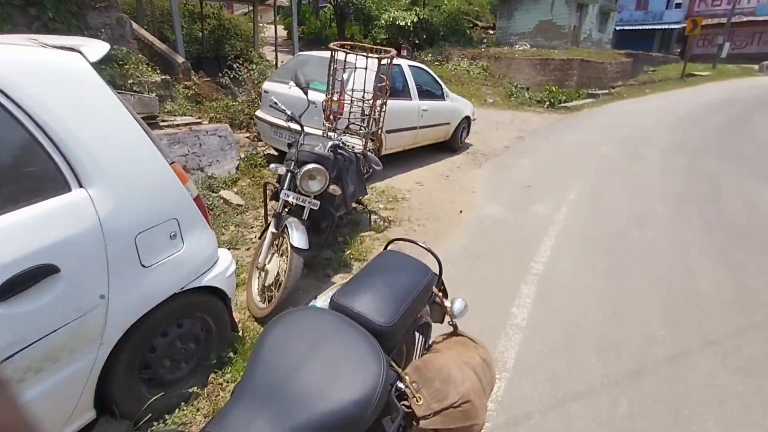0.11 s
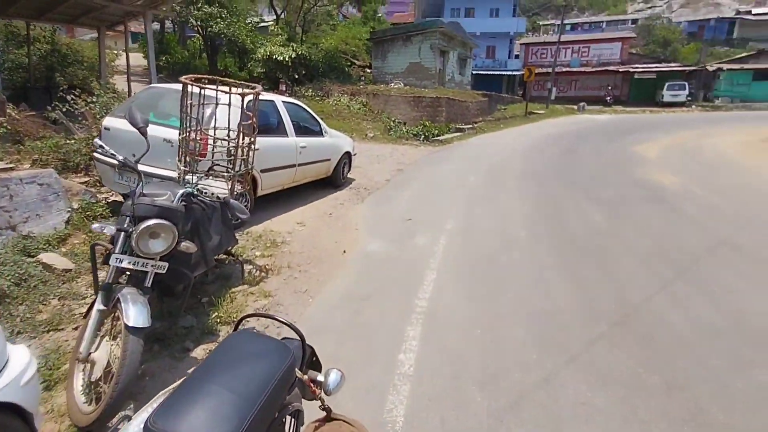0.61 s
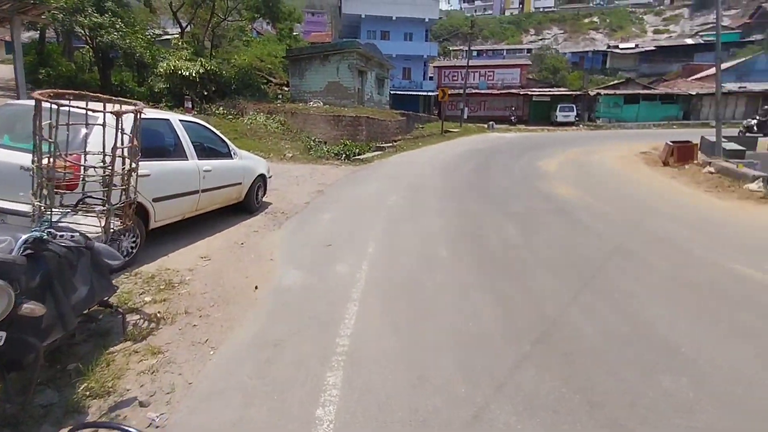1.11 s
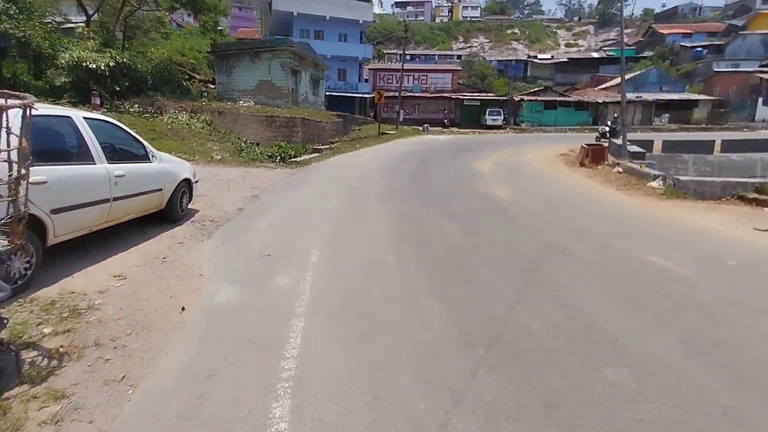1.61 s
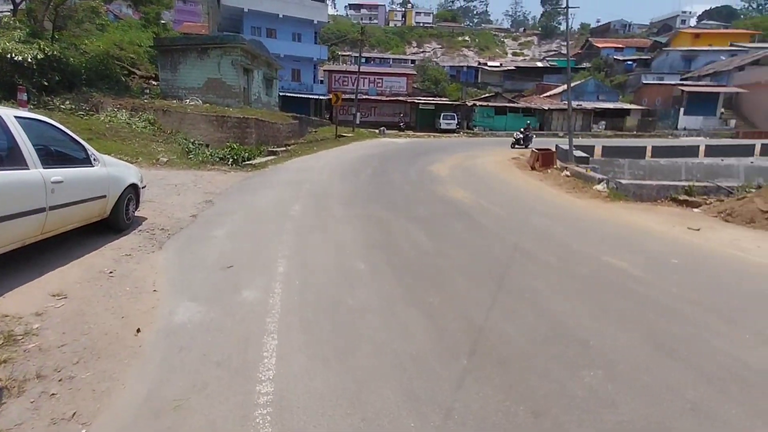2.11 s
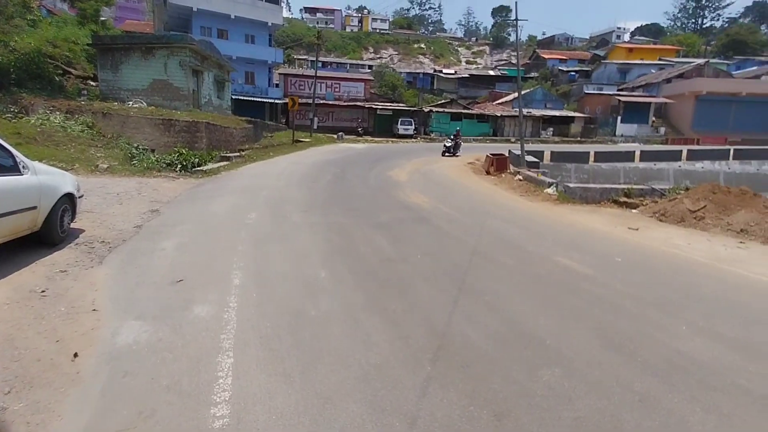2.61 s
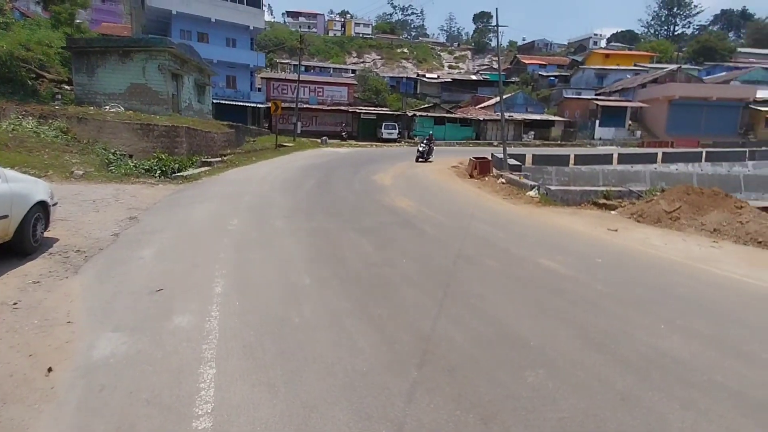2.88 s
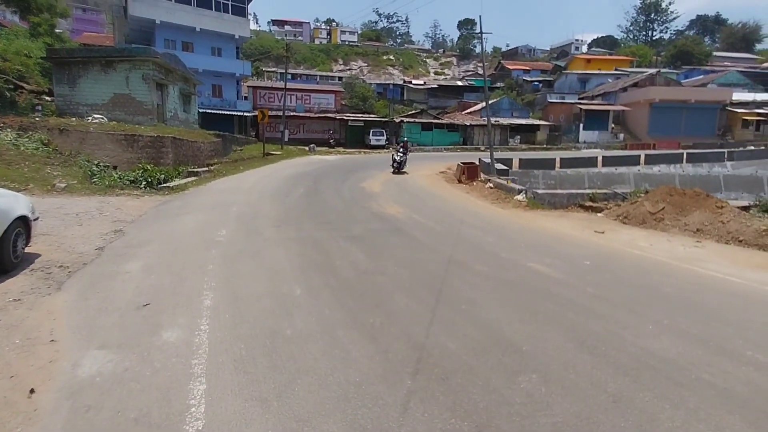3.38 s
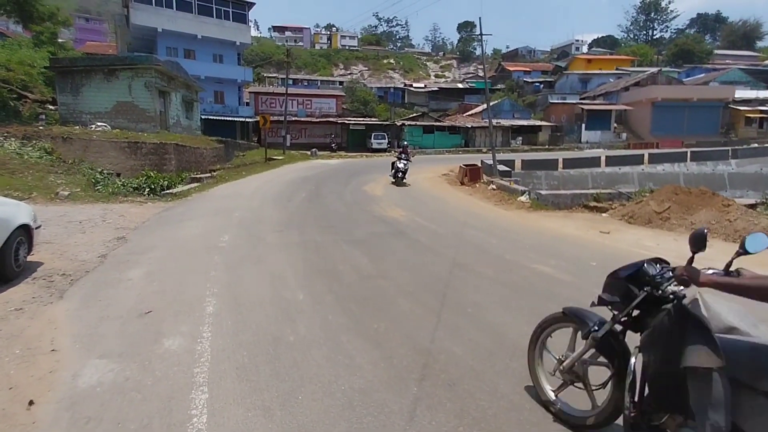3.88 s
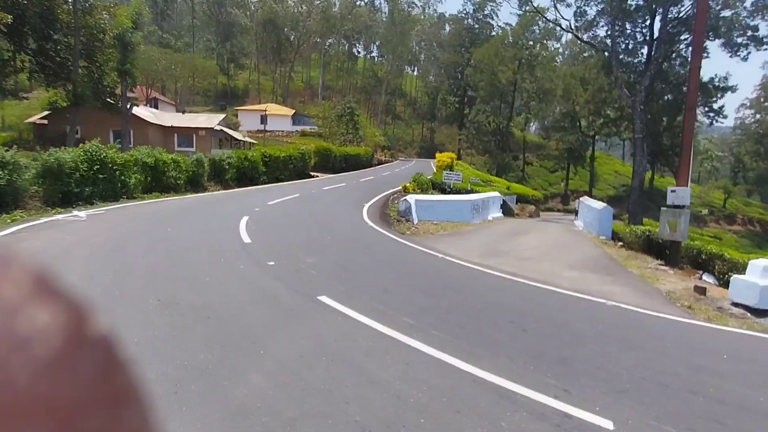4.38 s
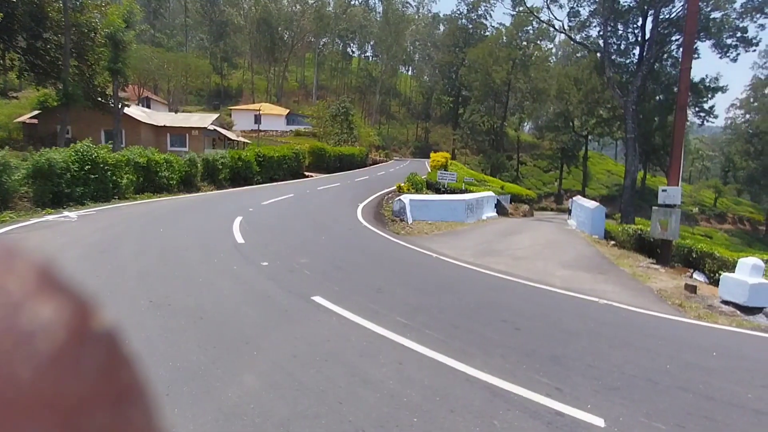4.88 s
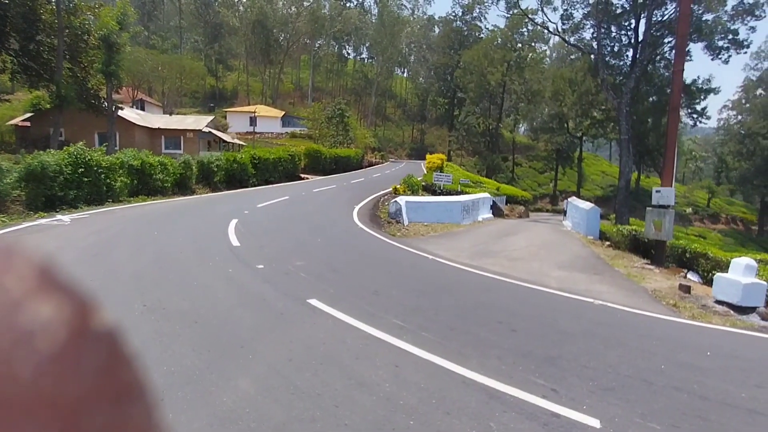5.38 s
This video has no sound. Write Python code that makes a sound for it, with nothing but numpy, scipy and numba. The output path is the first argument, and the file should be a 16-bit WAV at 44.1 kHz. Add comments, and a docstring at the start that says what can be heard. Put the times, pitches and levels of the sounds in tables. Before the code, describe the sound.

A distant motorcycle drones by a roadside, another single-cylinder bike thuds past very close, then an abrupt cut to wind buffeting and faint bird chirps.

```python
"""Roadside heard through a two-port microphone, then a quiet country road after a cut and a short silence.
A distant single-cylinder motorcycle drones (summed engine orders) over road noise (coloured noise bands);
a narrow pipe note joins, a second machine comes up close from behind (pulses ringing resonators), gravel
crunches (random clicks), and whistles, gear whine, a squeak and a bending rattle follow. After the silence,
wind buffets each port (noise, grains, pressure pulses), leaves rustle (noise) and a bird chirps (sines)."""
import sys
import numpy as np
from scipy import signal
from scipy.fft import rfft, irfft
from scipy.io import wavfile
from scipy.ndimage import uniform_filter1d
from numba import njit

SR = 44100
rng = np.random.default_rng(int(sys.argv[2]) if len(sys.argv) > 2 else 0)


def bounce(signal):
    """Save signal as a 16-bit WAV file at the path given by the first command-line argument."""
    frames = np.transpose(np.atleast_2d(signal))
    limited = np.clip(frames, -1, 1)
    pcm = np.round(limited * 32767).astype(np.int16)
    wavfile.write(sys.argv[1], SR, pcm)


def field_ratio(decibels):
    """Amplitude ratio for a level in dB (20 dB per decade); scalars and array-likes work."""
    return 10 ** (np.asarray(decibels, dtype=float) / 20)


N = 242550
T = np.arange(N) / SR
CUT_S, RESUME_S = 4.26885, 4.3205  # silence lies between
NEAR_START_S = 2.23  # the passing engine is heard from here
SIDES = np.array([[1], [-1]])  # left, right

# firing rate of the passing engine: t/s, f/Hz
PASSING_RATE = [(2.2, 31.31), (2.4, 32.11), (2.6, 33.33), (2.75, 32.7), (3.0, 31.36), (3.2, 30.89),
                (3.4, 29.93), (3.6, 29.46), (3.8, 28.43), (3.87, 30.73), (3.94, 29.92), (4.0, 32.21),
                (4.05, 31.15), (4.09, 26.11), (4.145, 26.22), (4.2, 28.04), (4.27, 30.19)]


def columns(table):
    """Linear interpolation: the curve columns of a table at every sample."""
    s, *cols = np.transpose(table)
    return [np.interp(T, s, c) for c in cols]


def unit(x):
    """Normalisation to rms 1."""
    return x / np.sqrt(np.mean(x ** 2))


def bump(s, width):
    """Gaussian envelope, top 1, falling to 1/e at width seconds from s."""
    return np.exp(-((T - s) / width) ** 2)


@njit
def svf(x, hz, width):
    """State-variable band-pass: a resonator with moving centre and width, gain 1 at the centre."""
    y, b, l = np.empty(len(x)), 0., 0.
    for i in range(len(x)):
        g, k = np.tan(np.pi * hz[i] / SR), width[i] / hz[i]
        v = (b + g * (x[i] - l)) / (1 + g * (g + k))
        b, l, y[i] = 2 * v - b, l + 2 * g * v, k * v
    return y


def ring(x, hz, width_hz):
    """Forced resonance: one resonator driven by x, rms 1."""
    return unit(svf(x, hz + 0 * T, width_hz + 0 * T))


def walk(rate):
    """Slow random modulation: levels held 1 / rate s and smoothed twice; spread near 1."""
    k = int(SR / rate)
    held = np.repeat(rng.standard_normal(N // k + 1), k)
    return 1.19 * uniform_filter1d(uniform_filter1d(held, k), k)[:N]


def band(x, colour, lo_hz, hi_hz):
    """Spectral shaping: x coloured by (f/Hz, level/dB) points within one soft-edged band, rms 1."""
    f = np.arange(1, N // 2 + 2) * SR / N
    hz, db = np.transpose(colour)
    edges = 1 / np.sqrt((1 + (lo_hz / f) ** 8) * (1 + (f / hi_hz) ** 8))
    gain = field_ratio(np.interp(np.log(f), np.log(hz), db))
    return unit(irfft(rfft(x) * gain * edges, N))


def ports(x, lag, pan_db):
    """Time and level differences: the left port hears x lag samples after the right, pan_db louder."""
    pair = np.array([np.interp(T - side * lag / 2 / SR, T, x) for side in (1, -1)])
    return pair * field_ratio(SIDES * pan_db / 2)


def pressure_pulse(s, width):
    """Pressure pulse with a dip on either side (negative second derivative of a Gaussian), top 1."""
    u = (T - s) / width
    return (1 - u ** 2) * np.exp(-u ** 2 / 2)


def wavering_tone(hz, db):
    """Frequency and amplitude modulation of a sine by slow random walks; mute below -69 dB."""
    phase = 2 * np.pi * np.cumsum(hz * (1 + .002 * walk(60))) / SR
    return field_ratio(db + 2.0 * walk(30)) * np.sqrt(2) * np.sin(phase) * (db > -69)


def far_bike():
    """Fourier synthesis: engine orders beat as firings; those near a favoured note are lifted."""
    # distant engine: t/s, firing rate f/Hz, level/dB, f/Hz of the note reflections favour, its lift/dB
    course = [(0, 33.48, -48, 196, 22), (.12, 32.97, -37, 198, 15), (.59, 33.66, -29.5, 213, 10),
              (.85, 34.17, -28.5, 201, 18), (.97, 34.18, -29.5, 205, 19.5), (1.11, 34.23, -27.5, 206, 16.5),
              (1.2, 34.52, -27.5, 202, 12.5), (1.31, 34.82, -29, 175, 15), (1.38, 34.64, -26.5, 198, 15),
              (1.46, 34.36, -27.5, 169, 13), (1.62, 34.44, -26, 205, 14.5), (1.76, 35.03, -31.5, 224, 20),
              (2.04, 34.56, -33, 220.5, 18), (2.1, 34.63, -35, 189, 10), (2.21, 33.84, -32, 201, 21),
              (2.29, 32.17, -32.5, 162, 24.5), (2.4, 31.35, -41, 159, 15), (2.45, 31.7, -33.5, 156, 29)]
    # harmonic spectrum: order, level/dB re the engine before lift and wavering
    orders = [(1, -34), (2, -8), (3, -15.5), (4, -34), (5, -15.5), (6, -16), (7, -14), (8, -16), (9, -18),
              (10, -17.5), (11, -22.5), (12, -26.5), (13, -26.5), (14, -29.5), (15, -28), (16, -29.5),
              (17, -30), (18, -30.5), (19, -34), (20, -37), (21, -47), (22, -41)]
    hz, level_db, favour_hz, lift_db = columns(course)
    phase = 2 * np.pi * (.6 + np.cumsum(hz) / SR)
    out = 0
    for order, db in orders:
        k = round(order)
        # low orders trail one another so each beat rings; the upper ones arrive together as a tick
        low = min(k, 10)
        db = db + lift_db * np.exp(-((k * hz - favour_hz) / 29) ** 2)
        # all waver; the upper orders come and go
        db = db + .8 * walk(10.48) + 2.0 * max(low - 7, 0) ** .5 * walk(7.0)
        if k == 3:  # this order booms for a while
            db = db + 12 * bump(0.64, 0.41)
        trail = .13 * low * (2 * k - low)
        scatter = 1.5 * (rng.random() + 0.05 * low * walk(7.94))
        out = out + field_ratio(level_db + db) * np.cos(k * phase - trail + scatter)
    fade = np.clip((2.55 - T) / 0.45, 0, 1)
    return ports(np.sqrt(2) * out * fade, 4.6, -1.6)


def road(cycle):
    """Broadband noise radiation: rumble, tyres, rattle and hiss; casing modes ring, a firing puffs."""
    # road and machinery: t/s, nearness level/dB
    nearness = [(0, 2.5), (.2, -2.5), (.28, 3.5), (.6, 2.5), (1.04, 4), (1.55, 7.5), (1.7, 6.5), (2.2, 6),
                (2.56, 5), (3.05, 10), (3.49, 15.5), (3.78, 21), (3.98, 23), (4.04, 27), (4.19, 17.5),
                (4.26, 20.5)]
    # noise spectrum: f/Hz, level/dB per Hz before each band is normalised
    colour = [(15, -62), (25, -30.5), (74, -10), (130, -14.5), (200, -9.5), (451, -29), (863, -32.5),
              (1100, -35.5), (1330, -37.5), (1650, -34.5), (2160, -35.5), (2690, -46), (6210, -49),
              (7310, -45.5), (8360, -57.5), (11000, -45), (16000, -47.5)]
    # casing resonances: f/Hz, width/Hz, mean level/dB before colouring
    casing = [(1730, 290, -19), (2300, 430, -20), (2670, 300, -2)]
    # bands: low f/Hz, high f/Hz, level/dB at nearness 0, slope/(dB/dB), late change/dB, likeness 0-1
    layers = [(20, 1120, -38.5, 0.25, -0.5, 0.62), (422, 356, -50.5, 0.3266, 4, 0.99),
              (500, 750, -57.5, 0.84, -11, 0.6), (830, 1250, -50.5, 0.4751, 4.5, 0.41),
              (1560, 3600, -54.5, 0.8165, -5, 0.31), (3060, 6090, -55, 0.6326, 3, 0.01),
              (8200, 12800, -66, 1.1075, -1.2, 0)]
    # port delay of the shared noise: t/s, samples by which the left trails
    delay = [(.6, -8), (1.3, 13), (3, 14.5)]
    near_db, = columns(nearness)
    lag, = columns(delay)
    # as the engine draws level the road sound changes: some bands sink, others rise
    late = np.clip((T - 3.98) / .06, 0, 1)
    puff = 1 + 0.5 * np.exp(-cycle / 0.76) * (T > NEAR_START_S)
    shared = walk(4.91)
    out = 0
    for lo_hz, hi_hz, far_db, slope, late_db, alike in layers:
        noise, left, right = rng.standard_normal((3, N))
        same = noise
        # the casing resonances drift and flicker, so they show as patches
        for hz, width_hz, db in casing:
            if lo_hz < hz < hi_hz:
                drifting_hz = hz * (1 + 0.036 * walk(3.47))
                same = same + field_ratio(db + 2.6 * walk(16)) * ring(noise, drifting_hz, width_hz)
        same, left, right = (band(v, colour, lo_hz, hi_hz) for v in (same, left, right))
        pair = np.sqrt(alike) * ports(same, lag, 0) + np.sqrt(1 - alike) * np.array([left, right])
        pair = pair * field_ratio(SIDES * 2.5 / 2 * (lo_hz > 3000))  # the hiss leans left
        level_db = far_db + slope * near_db + late_db * late + 0.71 * shared + 1.0 * walk(20)
        out = out + pair * field_ratio(level_db) * puff
    return out * field_ratio(SIDES * -0.8 / 2)


def drone(cycle):
    """Pipe resonance: firings and some gas noise drive one narrow mode."""
    # pipe note: t/s, f/Hz, mean level/dB
    note = [(1.85, 840, -63), (2.04, 860.3, -49), (2.15, 838, -53), (2.36, 825, -45), (2.5, 833, -44),
            (2.62, 838, -45), (2.75, 840, -50), (2.92, 827, -44), (3.0, 830, -55), (3.08, 830, -46),
            (3.16, 826, -57), (3.27, 860, -42), (3.36, 874, -50), (3.5, 900, -48), (3.62, 973, -44.5),
            (3.8, 940, -55)]
    hz, db = columns(note)
    firings = unit(1. * (np.diff(cycle, prepend=0) < 0))
    drive = firings + .7 * rng.standard_normal(N)
    tone = ring(ring(drive, hz, 38), hz, 99)
    on = (T > note[0][0]) & (T < note[-1][0])
    return ports(field_ratio(db + 1.4 * walk(25.5)) * tone * on, 9.4, 0)


def near_bike():
    """Impulse excitation: firings thud, ring silencer and pipe, echo off a wall; also gives the cycle."""
    # passing engine: t/s, level/dB, silencer ring/dB re that level before an 8.5 dB cut, ring f/Hz
    course = [(2.2, -39, 4.5, 180), (2.27, -29.5, -22, 174.1), (2.37, -33.5, 6.5, 161),
              (2.61, -34, 0.5, 163), (2.71, -31, -27, 166), (2.77, -29.5, 4, 160), (3.24, -27, 0, 182),
              (3.29, -26.5, -7, 185), (3.45, -26, 6.5, 177), (3.66, -24.5, 2.5, 168), (3.85, -24, 0.5, 131),
              (3.92, -27.5, 12, 184), (4.0, -25.5, 13.5, 192), (4.09, -26.5, 12.5, 189),
              (4.16, -24.5, 11.5, 192), (4.26, -22, 11.5, 197)]
    # blunt thud heard ahead of the machine: f/Hz, level/dB per Hz before normalising
    thud_colour = [(30, -35), (62, -50), (92, 0), (125, 2.5), (185, -1.5), (250, -29.5), (330, -47),
                   (450, -45)]
    # bark of the pipe: t/s, f/Hz, level/dB re the engine
    bark_course = [(2.6, 300, -16), (2.8, 290, -13), (3.2, 270, -12), (3.4, 220, -10), (3.8, 210, -10),
                   (3.92, 270, -16), (4.07, 277, -19), (4.26, 276, -21)]
    start = int(PASSING_RATE[0][0] * SR)
    turns = np.cumsum(columns(PASSING_RATE)[0]) / SR  # one turn per firing
    turns = turns - turns[start] + .61
    fired = start + np.flatnonzero(np.diff(np.floor(turns[start:])))
    pulses = np.zeros(N)
    pulses[fired] = -field_ratio(0.092 * rng.standard_normal(len(fired)))
    level_db, ring_db, ring_hz = columns(course)
    # close by, the direct sound wins: the echo weakens and each ring dies sooner
    clear = np.clip((T - 4.06) / .08, 0, 1)
    echo = np.roll(pulses, int(.0105 * SR))
    pulses = pulses + .27 * .3 ** clear * echo
    thud = band(np.roll(pulses, int(0.0025 * SR)), thud_colour, 10, 4800)
    # the gas leaves as a soft push of a few milliseconds
    push = np.sin(np.pi * np.clip(np.arange(400) / SR / .0035, 0, 1)) ** 2
    gas = signal.fftconvolve(pulses, push)[:N]
    ring_width_hz = 58 + (85 - 58) * clear
    silencer = ring(ring(gas, ring_hz, ring_width_hz), ring_hz, 300)
    bark_hz, bark_db = columns(bark_course)
    bark = ring(ring(gas, bark_hz, 70), bark_hz, 110)
    # the lowest pipe note comes up at close range
    boom = field_ratio(-8) * bump(3.88, 0.3) * ring(ring(gas, 61, 14), 61, 28)
    # the throttle opens again: the thud gives way to the ring
    opened = np.clip((T - 3.87) / 0.039, 0, 1)
    engine = field_ratio(-7 * opened) * thud + boom + field_ratio(ring_db - 8.5) * silencer + field_ratio(bark_db) * bark
    # the bearing swings round towards abreast at 4.4 s; samples
    lag = 18.5 * np.sin(np.arctan((4.4 - T) / 0.42))
    return ports(field_ratio(level_db) * engine * (T > NEAR_START_S), lag, -1), turns % 1


def gravel():
    """Impact noise: stones under a tyre crack in quick bursts of unequal clicks, the loudest ringing."""
    # bed of small cracks: t/s, level/dB before an 8 dB cut and flicker
    bed_course = [(2.22, -45), (2.27, -33.5), (2.31, -31), (2.35, -33), (2.374, -33), (2.4, -40),
                  (2.42, -32.5), (2.46, -36.5), (2.54, -49)]
    # crack spectrum: f/Hz, level/dB per Hz before normalising
    colour = [(400, 2.5), (800, 8), (1300, 4.5), (2400, 6), (3300, 2), (4800, -8), (6000, -17), (8400, -26),
              (11000, -21), (15000, -22)]
    # loudest cracks: t/s, relative level/dB
    loudest = [(2.233, -38), (2.256, -35), (2.2734, -34), (2.283, -33), (2.292, -31), (2.3061, -28),
               (2.3241, -22), (2.3421, -23), (2.349, -21), (2.362, -26), (2.3729, -24), (2.383, -30),
               (2.3924, -34), (2.408, -34), (2.4184, -25), (2.4423, -27), (2.455, -30)]
    spurts = sum(field_ratio(db) * bump(s + .0015, 0.0013) for s, db in loudest)
    on = np.clip((T - 2.24) / 0.022, 0, 1) * np.clip((2.54 - T) / 0.093, 0, 1)
    bed = field_ratio(columns(bed_course)[0] - 8.0 + 2.1 * walk(160)) * on
    struck = rng.random((3, N)) < 3000 / SR  # mean rate 3000 per second
    size = field_ratio(3.0 * rng.exponential(size=(3, N)))
    cracks = struck * size * rng.choice([-1, 1], (3, N))
    same, left, right = (band(v, colour, 300, 15000) for v in cracks)
    rings = 0
    for s, db in loudest:
        u = np.maximum(T - s, 0) / 0.0013
        hz = 2387 * (1 + 0.082 * rng.standard_normal())
        rings = rings + field_ratio(db + 2.0) * u * np.exp(-u) * np.sin(2 * np.pi * hz * (T - s))
    pair = ports(same, 18.6, 0) + 1.63 * np.array([left, right])
    return pair * (bed + 0.34 * spurts) + ports(rings, 19.0, 0)


def whistles():
    """Tone plus narrow-band noise: brief breathy whistles of the passing machine glide and fade."""
    # glides: start t/s, end t/s, start f/Hz, end f/Hz, level/dB of the tone at its height before panning
    glides = [(2.55, 2.8, 1700, 1700, -51), (2.8, 3.0, 1740, 1720, -53), (3.13, 3.38, 2540, 2450, -57),
              (3.32, 3.42, 2040, 2050, -47), (3.53, 3.64, 2500, 2720, -45), (3.58, 3.72, 2320, 2190, -45),
              (3.67, 3.9, 1850, 1700, -44), (3.71, 3.85, 2200, 2270, -40), (3.76, 3.84, 2410, 2430, -42),
              (3.82, 3.96, 2330, 2400, -43), (3.86, 4.06, 2900, 2920, -49), (3.93, 3.99, 2660, 2740, -41),
              (3.97, 4.05, 1830, 1700, -41), (4.04, 4.12, 1680, 1500, -35), (3.99, 4.08, 2300, 2180, -44),
              (3.98, 4.1, 3600, 3600, -45), (4.0, 4.09, 4750, 4900, -49), (4.02, 4.19, 4300, 4120, -43),
              (4.01, 4.1, 780, 950, -38)]
    out = 0
    for start, end, from_hz, to_hz, db in glides:
        u = np.clip((T - start) / (end - start), 0, 1)
        pitch = from_hz + (to_hz - from_hz) * u
        phase = 2 * np.pi * np.cumsum(pitch * (1 + .006 * walk(60))) / SR
        breath = ring(rng.standard_normal(N), pitch, 70)
        out = out + field_ratio(db) * np.sin(np.pi * u) * (np.sqrt(2) * np.sin(phase) + 1.3 * breath)
    return ports(out, 16.6, -1.3)


def gear_whine():
    """Tooth-mesh tone: a whine locked to the firing rate at its 36th order."""
    # whine: t/s, mean level/dB before panning
    loudness = [(2.62, -68), (2.76, -38.5), (2.82, -48), (2.87, -50), (2.97, -37), (3.03, -54), (3.15, -60),
                (3.22, -45), (3.3, -38.5), (3.42, -38.5), (3.5, -51), (3.56, -66)]
    return ports(wavering_tone(36 * columns(PASSING_RATE)[0], columns(loudness)[0]), 16.6, -1.3)


def squeak():
    """Frequency glide: one squeak arches up and sinks."""
    # squeak: t/s, mean f/Hz, mean level/dB before panning
    arch = [(3.27, 4080, -70), (3.31, 4150, -53), (3.345, 4250, -48), (3.37, 4480, -48), (3.395, 4650, -47),
            (3.42, 4770, -45), (3.45, 4670, -48), (3.48, 4540, -49), (3.515, 4380, -46), (3.545, 4200, -48),
            (3.575, 4100, -44), (3.6, 4060, -70)]
    return ports(wavering_tone(*columns(arch)), 16.6, -1.3)


def sweep():
    """Path interference as a moving noise band: rattle between direct and ground path bends with angle."""
    # bending resonance: t/s, centre f/Hz, mean level/dB
    bend = [(3.35, 2150, -65), (3.55, 2300, -36), (3.75, 2160, -42), (3.88, 2330, -48), (3.95, 2400, -50),
            (4.0, 1850, -47), (4.08, 1550, -41), (4.15, 1190, -41), (4.26, 950, -46)]
    hz, db = columns(bend)
    on = (T > bend[0][0]) & (T < bend[-1][0])
    tone = ring(ring(rng.standard_normal(N), hz, 270), hz, 456)
    return ports(field_ratio(db + 2.0 * walk(33)) * tone * on, 28.7, 0)


def wind():
    """Turbulent pressure: eddies push each port on its own, low buffets under a grainy flutter."""
    # wind strength: t/s, left level/dB, right level/dB
    strength = [(4.322, -25, -33), (4.34, -23, -33), (4.365, -19, -31), (4.385, -19, -27),
                (4.405, -24, -24), (4.425, -23, -27), (4.455, -22, -33), (4.478, -34, -35), (4.5, -35, -36),
                (4.525, -35, -25), (4.55, -29, -28), (4.575, -42, -30), (4.6, -44, -34), (4.625, -39, -31),
                (4.66, -50, -33), (4.68, -43, -35), (4.72, -41, -35), (4.75, -48, -38), (4.78, -43, -34),
                (4.81, -42, -25), (4.84, -54, -38), (4.86, -43, -34), (4.885, -40, -31), (4.92, -51, -34),
                (4.94, -44, -35), (4.98, -44, -32), (5.02, -48, -36), (5.08, -50, -38), (5.1, -57, -43),
                (5.12, -56, -33), (5.16, -58, -43), (5.2, -54, -38), (5.24, -59, -45), (5.28, -58, -43),
                (5.3, -66, -39), (5.34, -51, -43), (5.4, -49, -38), (5.44, -55, -42), (5.47, -52, -43),
                (5.5, -42, -35)]
    # steep spectrum of the buffets: f/Hz, level/dB per Hz before normalising
    buffet_colour = [(20, -15), (45, -5), (75, -4), (120, 0), (240, -2), (330, -20), (600, -46),
                     (1200, -70)]
    # spectrum of the flutter: f/Hz, level/dB per Hz before normalising
    flutter_colour = [(200, -39), (290, -1), (400, 0.5), (600, -11), (1000, -22.5), (2000, -39.5),
                      (3500, -73)]
    left_db, right_db = columns(strength)
    # the left port faces the wind: it flutters, and its buffets fall away steeply below -36 dB
    over_db = left_db + 36
    left_low_db = np.maximum(-25 + np.where(over_db > 0, 0.8, 8) * over_db, left_db - 20)
    left_high_db = left_db - .25 * np.maximum(over_db, 0)
    # the sheltered right port mostly buffets
    right_high_db = -60 + 2 * (right_db + 31)
    out = []
    for low_db, high_db in ((left_low_db, left_high_db), (right_db, right_high_db)):
        eddy = walk(40)
        size = field_ratio(3.0 * np.minimum(rng.exponential(size=N), 3))
        grains = (rng.random(N) < 700 / SR) * size * rng.choice([-1, 1], N)
        buffet = band(rng.standard_normal(N), buffet_colour, 20, 4600)
        flutter = band(grains, flutter_colour, 10, 5000)
        out.append(field_ratio(low_db + 1.4 * eddy) * buffet + field_ratio(high_db + 2.0 * eddy) * flutter)
    return np.array(out)


def lull():
    """Band-limited noise: a low rumble stays under the gusts, nearly all on the right port."""
    rumble = ring(ring(rng.standard_normal(N), 81, 46), 81, 73)
    return field_ratio(np.array([[-74], [-43]])) * rumble


def left_port_transients():
    """Transient pressure: pushes and sharp pops strike the left port; the right's gusts carry over as thumps."""
    # pops: t/s, level/dB before a 2 dB lift
    sharp_pops = [(4.376, -7.5), (4.383, -8), (4.399, -16), (4.423, -19), (4.447, -28), (4.457, -30),
                  (4.549, -25.5), (4.628, -28), (4.727, -35), (4.784, -44), (4.801, -38), (4.967, -37),
                  (5.051, -45), (5.485, -39), (5.496, -35)]
    # low thumps of the right port's gusts, carried over: t/s, peak level/dB
    carried_thumps = [(4.812, -24), (4.88, -48), (4.94, -47), (5.125, -49), (5.157, -48), (5.193, -42),
                      (5.3, -51), (5.42, -52)]
    # the sound resumes in the middle of a push
    since = np.maximum(T - RESUME_S, 0)
    out = field_ratio(-3.5) * np.exp(-since / 0.0019) * np.cos(2 * np.pi * 300 * since)
    out = out + field_ratio(-3.5) * pressure_pulse(4.363, 0.0013)  # one strong blow
    for s, db in sharp_pops:
        crack = field_ratio(-12) * bump(s, .00017)
        out = out + field_ratio(db + 2.0) * (pressure_pulse(s, 0.00051) + crack)
    for s, db in carried_thumps:
        out = out + field_ratio(db) * bump(s, 0.0074) * np.cos(2 * np.pi * 95 * (T - s))
    return np.array([out, np.zeros(N)])


def leaves():
    """Incoherent noise: a faint smooth rustle of distant leaves, unrelated left and right."""
    # swells: t/s, rise/dB, half width/s to 1/e of the rise
    swells = [(4.7, 11, 0.26), (5.17, 7, 0.084), (5.51, 8, 0.029)]
    # rustle spectrum: f/Hz, level/dB per Hz before normalising
    colour = [(700, -18), (1200, -2), (2700, -4.5), (3300, -6.5), (5250, -7), (7200, -5.5), (8300, -22),
              (11500, -21), (15500, -28)]
    noise = [band(rng.standard_normal(N), colour, 900, 15000) for _ in SIDES]
    swell_db = sum(db * bump(s, width) for s, db, width in swells)
    # it comes up just after the silence
    rise = np.clip((T - RESUME_S) / 0.052, 0, 1)
    return field_ratio(-70 + swell_db + SIDES * 2.0) * rise * np.array(noise)


def bird():
    """Frequency-modulated sine: very short falling chirps of a small bird with an octave overtone."""
    # chirps: t/s, level/dB of the fundamental before panning, start f/Hz, overtone/dB re it, length/s
    chirps = [(4.361, -62, 3430, 18, 0.0033), (4.5236, -51, 3820, -21, 0.01549),
              (4.529, -55, 3460, -4, 0.021), (4.6324, -63, 3430, -8, 0.012), (4.65, -52, 3860, -7, 0.013),
              (4.666, -54, 3540, -5, 0.016), (4.695, -48.5, 3760, -4, 0.018), (4.712, -51, 3480, 0, 0.014)]
    out = 0
    for s, db, hz, over_db, length in chirps:
        u = np.clip((T - s) / length, 0, 1)
        phase = 2 * np.pi * hz * length * (u - 0.01329 * u ** 2)
        voice = np.sin(phase) + field_ratio(over_db) * np.sin(2 * phase)
        out = out + field_ratio(db) * np.sin(np.pi * u) ** 2 * voice
    return ports(out, -4.5, 6.3)


def scene():
    """Superposition: roadside until the cut, silence, then the windy road."""
    near, cycle = near_bike()
    roadside = far_bike() + road(cycle) + drone(cycle) + near + gravel()
    roadside = roadside + whistles() + gear_whine() + squeak() + sweep()
    country = wind() + lull() + left_port_transients() + leaves() + bird()
    return roadside * (T < CUT_S) + country * (T >= RESUME_S)


def top_cut(x):
    """Nothing passes above the cut-off."""
    return signal.sosfilt(signal.butter(12, 16850, fs=SR, output="sos"), x)


def record(dry):
    """Clipping and low-pass filtering: peaks stop at full scale and the top is cut at 15850 Hz."""
    low_pass = signal.ellip(8, .2, 60, 15850, fs=SR, output="sos")
    mix = signal.sosfilt(low_pass, np.clip(dry, -1, 1))
    return top_cut(mix)


dry = scene()
out = record(dry)
bounce(out)
```